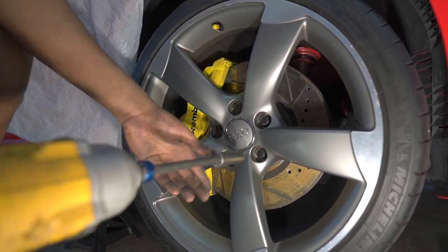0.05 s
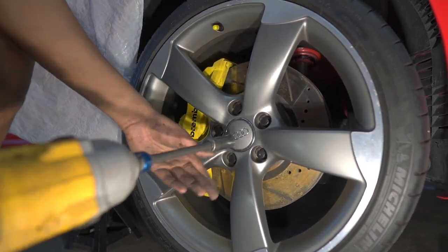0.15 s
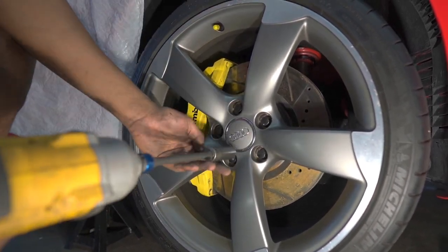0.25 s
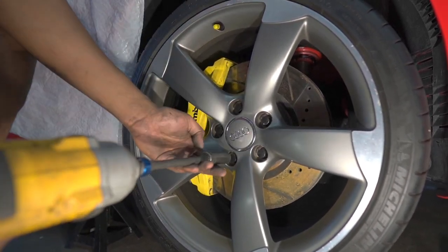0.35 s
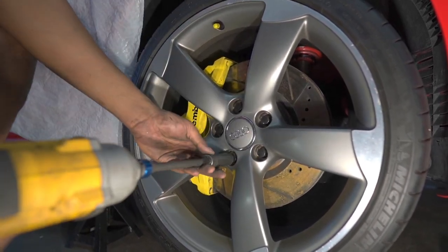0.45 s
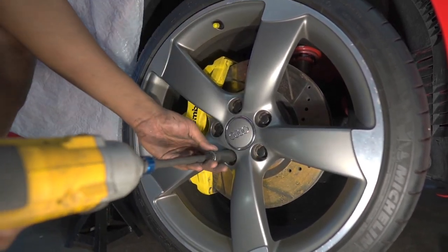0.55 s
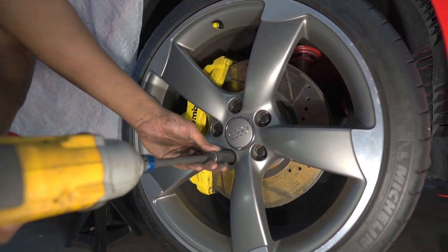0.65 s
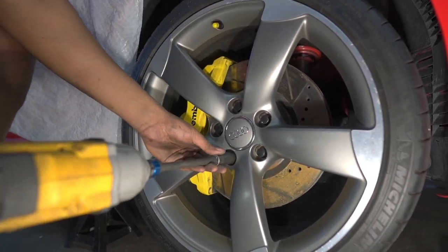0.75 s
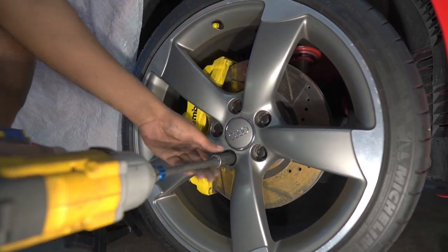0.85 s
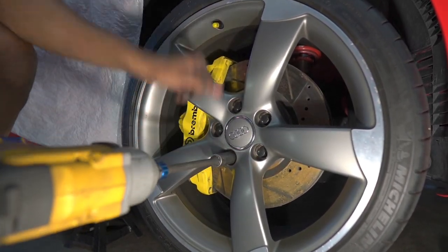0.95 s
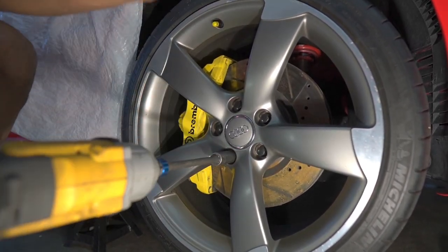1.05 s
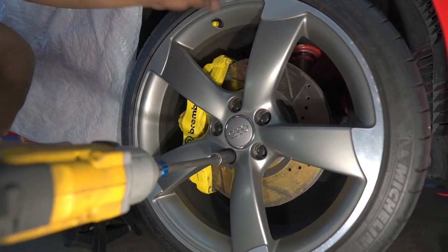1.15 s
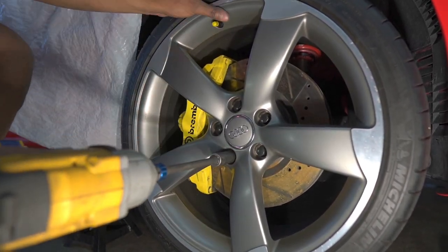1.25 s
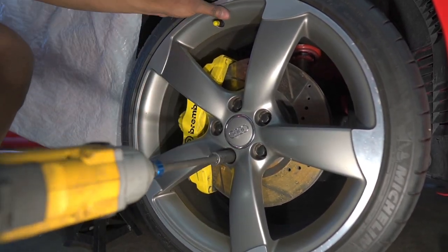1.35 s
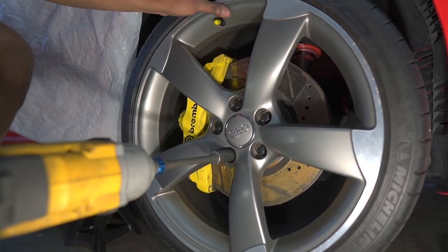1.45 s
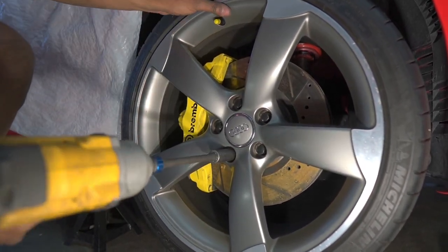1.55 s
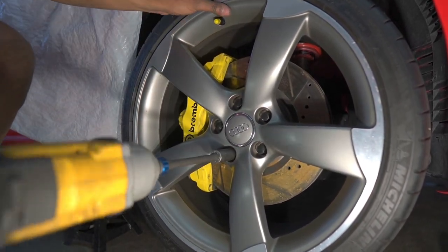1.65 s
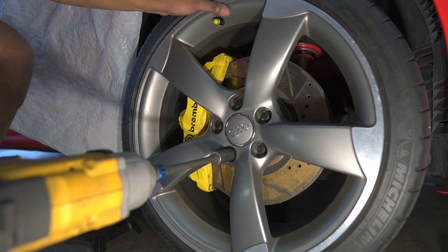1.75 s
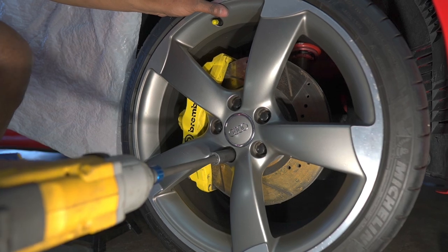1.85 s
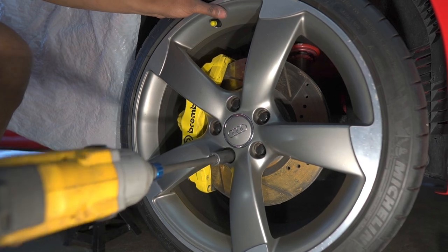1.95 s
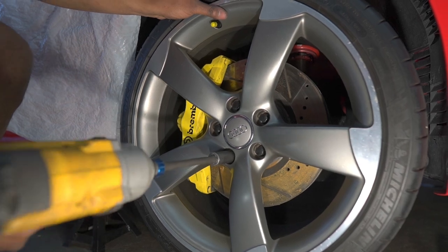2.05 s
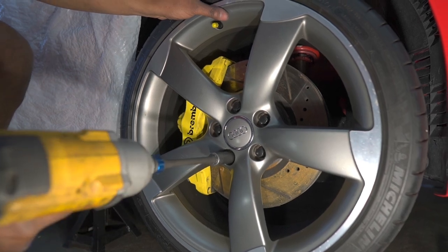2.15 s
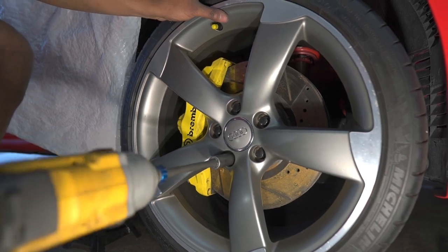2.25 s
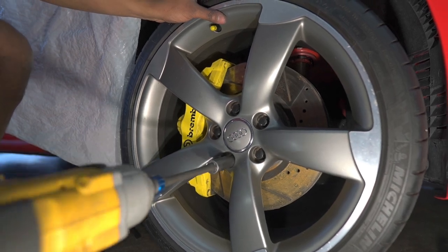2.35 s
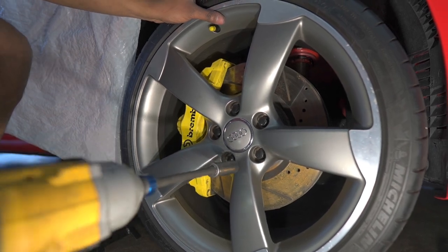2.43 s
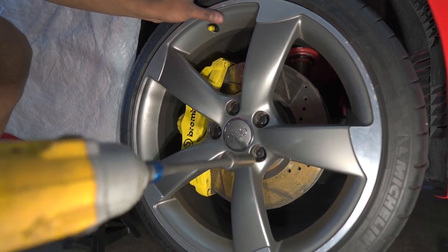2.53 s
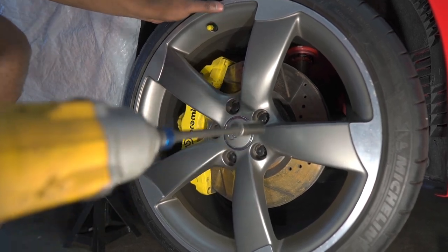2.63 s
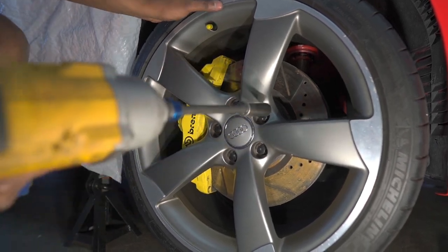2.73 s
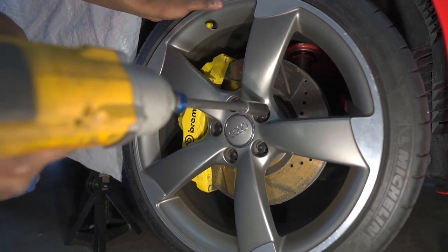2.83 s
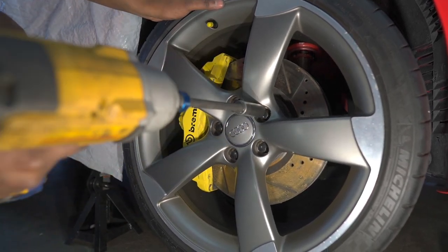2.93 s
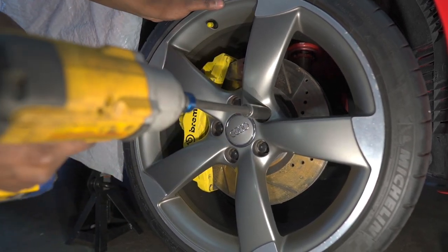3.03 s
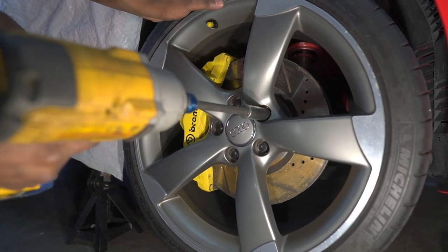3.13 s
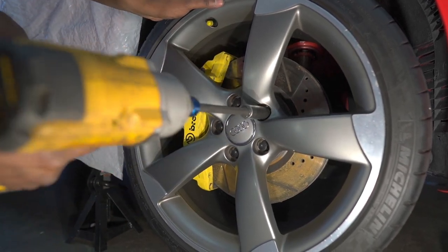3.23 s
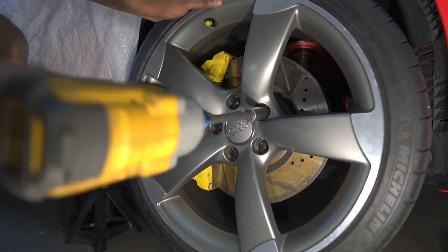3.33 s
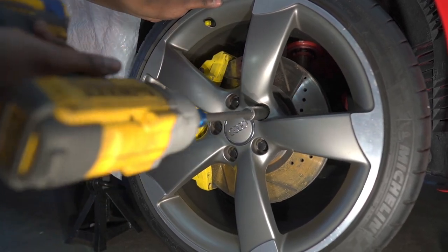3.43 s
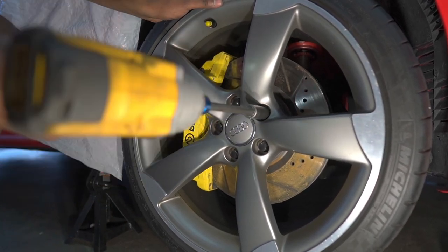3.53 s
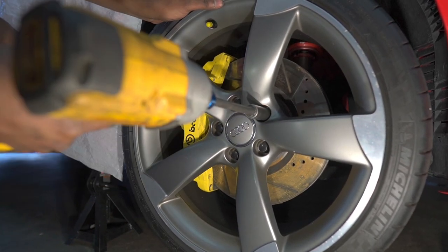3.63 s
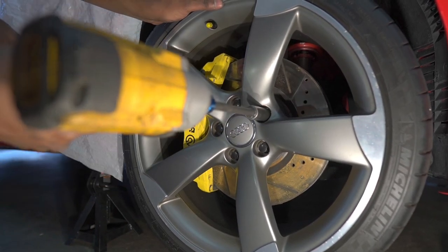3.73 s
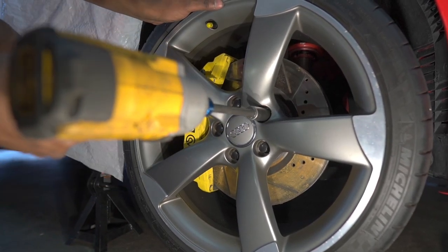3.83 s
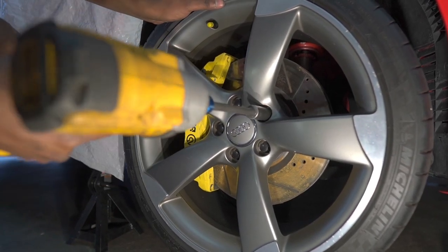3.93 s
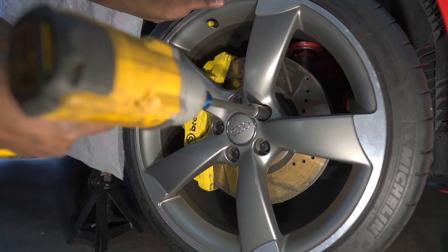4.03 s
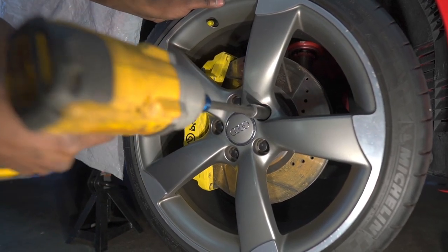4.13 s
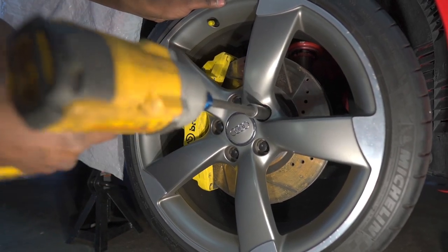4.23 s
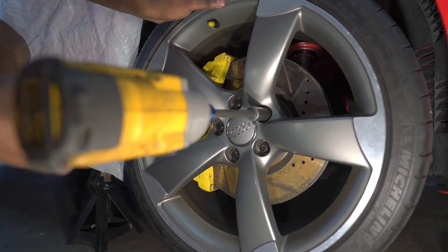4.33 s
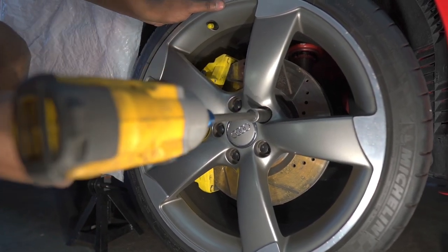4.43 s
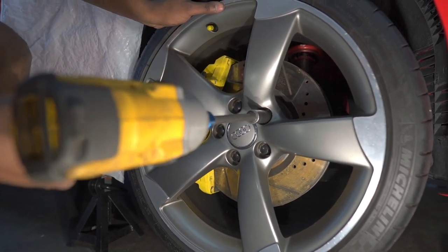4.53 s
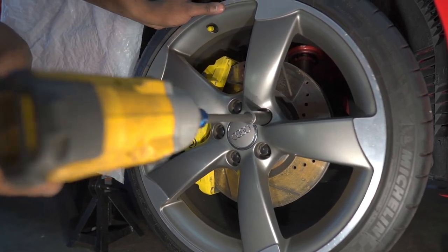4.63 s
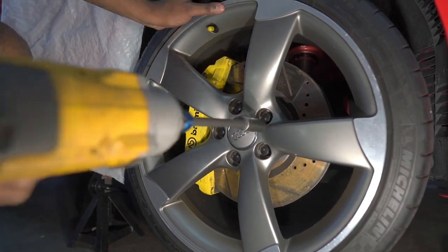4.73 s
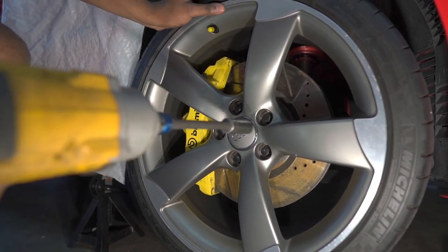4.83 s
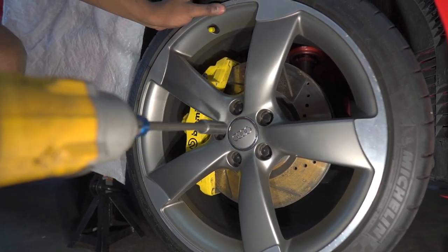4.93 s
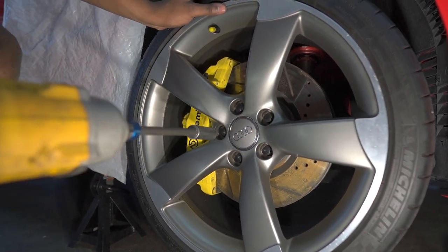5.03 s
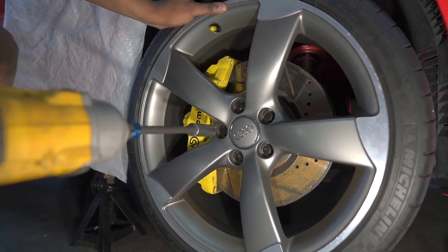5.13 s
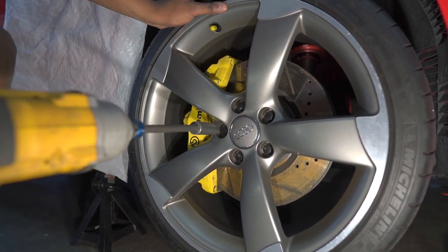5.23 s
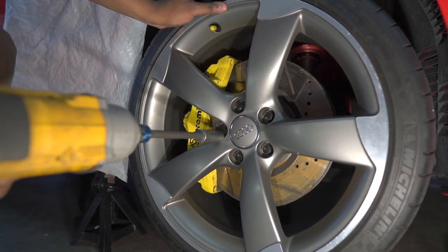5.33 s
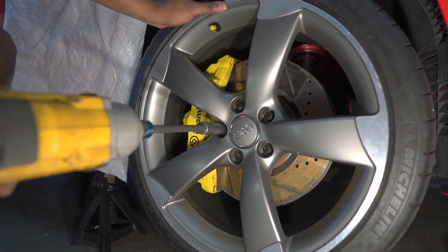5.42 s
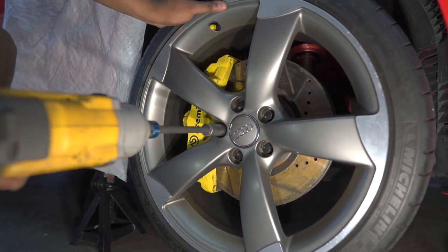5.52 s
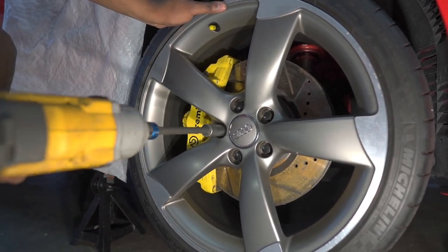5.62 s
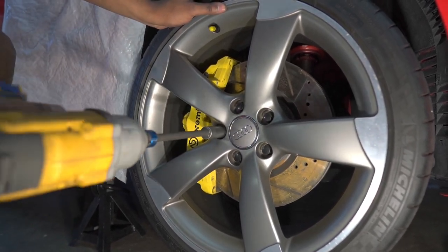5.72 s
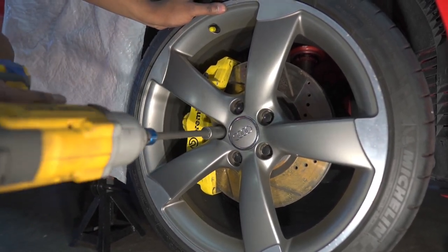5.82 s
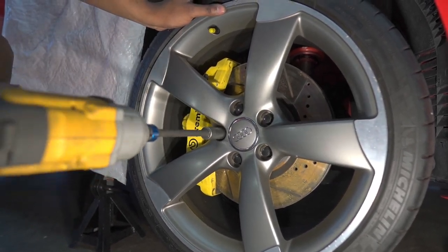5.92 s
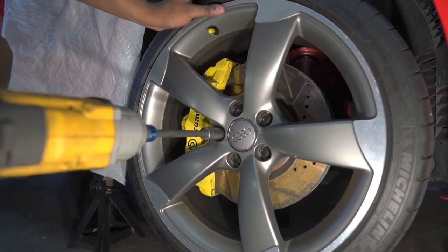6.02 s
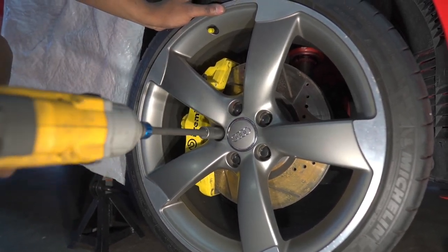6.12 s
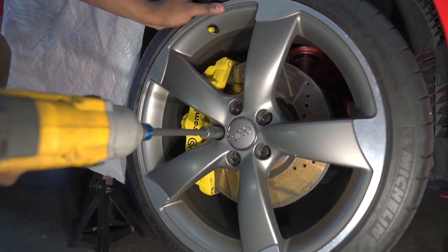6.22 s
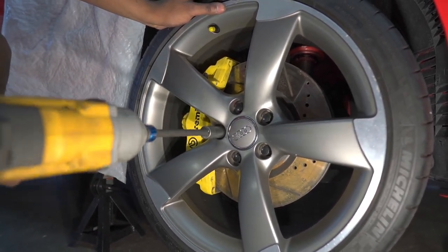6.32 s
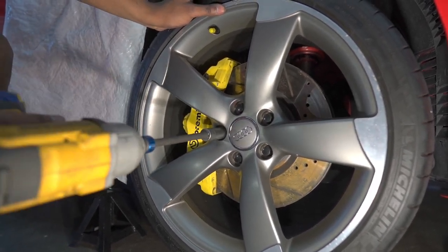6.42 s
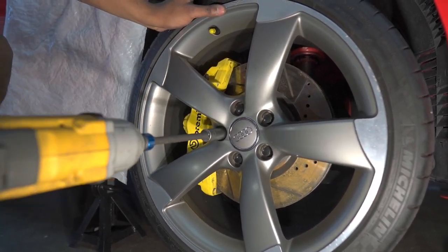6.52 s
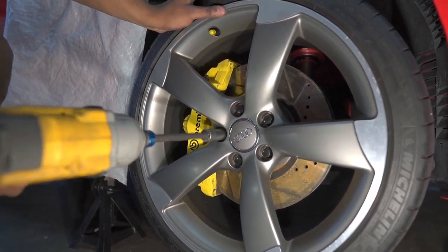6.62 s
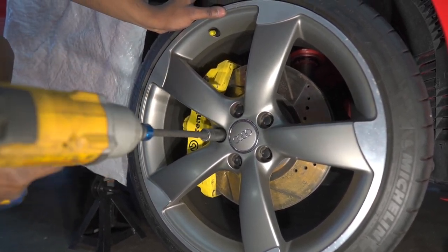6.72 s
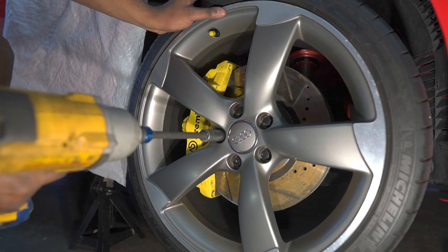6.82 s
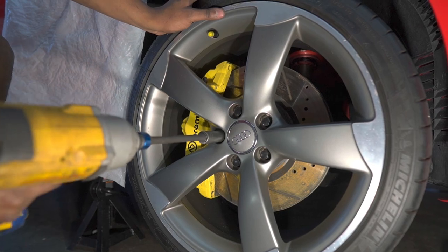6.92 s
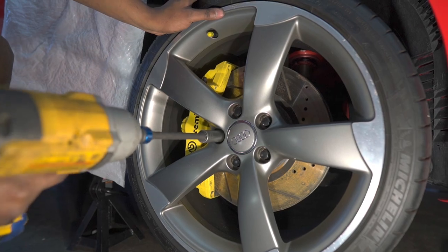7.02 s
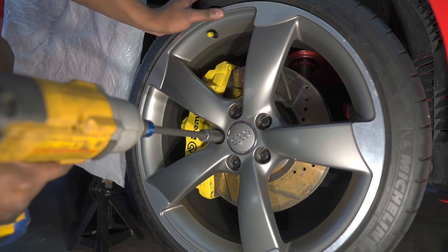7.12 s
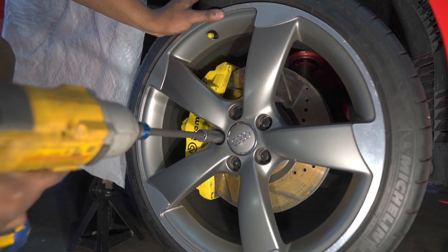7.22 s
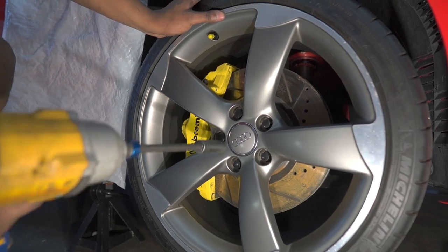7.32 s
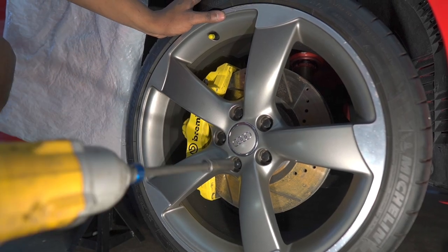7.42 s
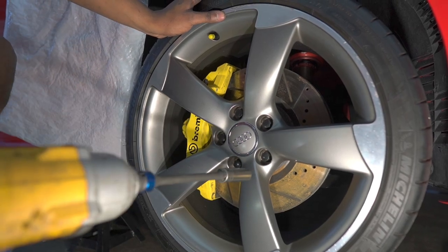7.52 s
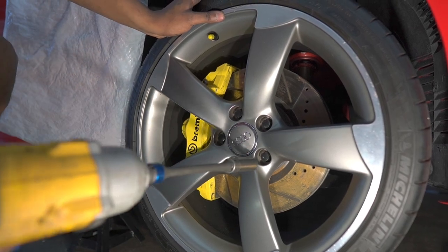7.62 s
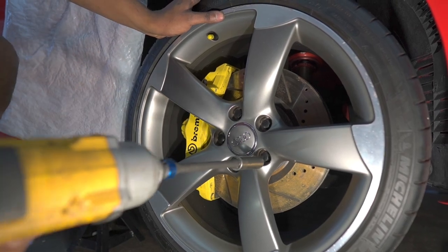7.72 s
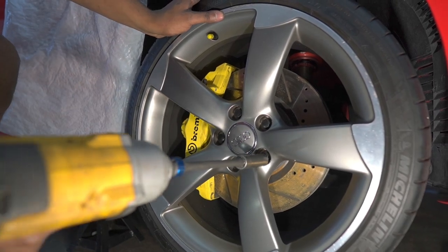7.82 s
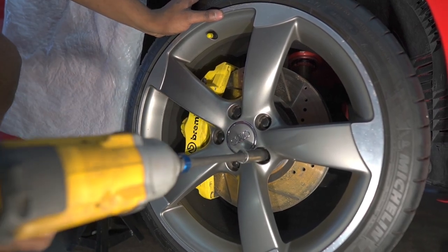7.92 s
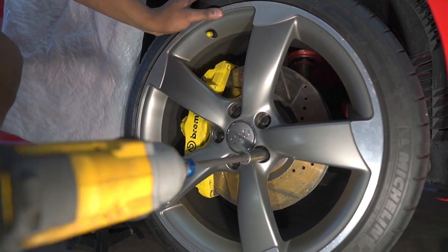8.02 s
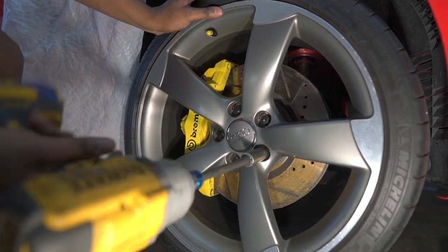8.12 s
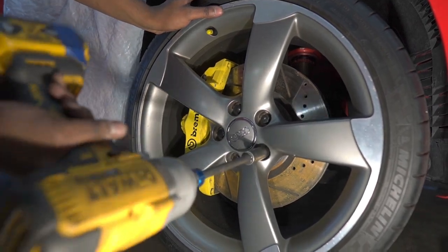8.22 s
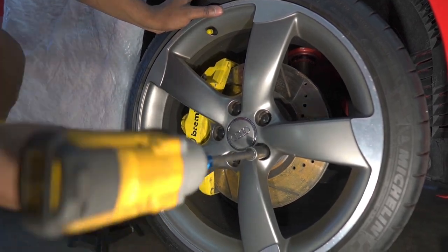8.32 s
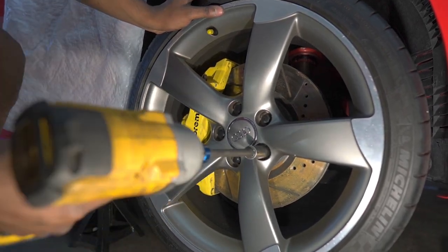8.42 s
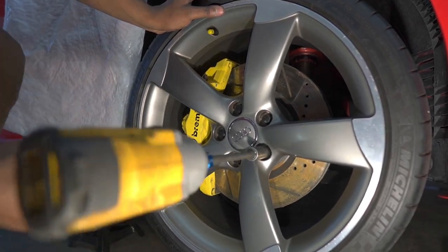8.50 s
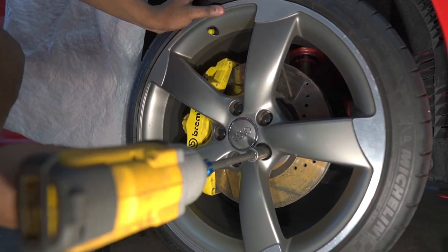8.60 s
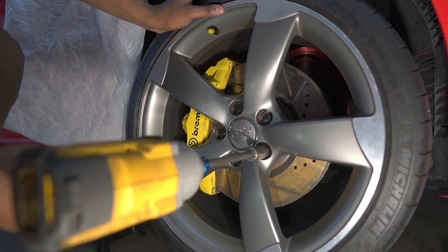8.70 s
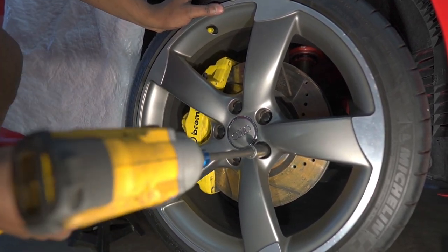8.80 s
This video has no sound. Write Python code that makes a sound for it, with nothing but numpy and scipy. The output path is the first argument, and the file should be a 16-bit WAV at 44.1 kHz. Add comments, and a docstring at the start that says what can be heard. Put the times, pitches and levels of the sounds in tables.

```python
"""Impact wrench on wheel bolts

A cordless impact wrench runs six short bursts in a garage, close to a small microphone: noise makes
the motor's whirr, and each hammer blow is a noise crack with a rough ring. Between bursts the socket
clicks onto the bolts, built from rattles and ringing modes, and knocks a hollow thud out of the wheel.
A bird chirps in gliding tones outside; a hand slides on the tool; hum and rumble lie under filtered air.
The blows overload the microphone, and puffs of cooling air push it against one rail."""
import sys
import numpy as np
from scipy import signal
from scipy.fft import rfft, irfft
from scipy.io import wavfile
from scipy.ndimage import uniform_filter1d

SR = 44100
rng = np.random.default_rng(int(sys.argv[2]) if len(sys.argv) > 2 else 0)


def wav_record(signal):
    """Record a signal, one row per channel, as 16-bit PCM in the file named by sys.argv[1]."""
    frames = np.transpose(np.atleast_2d(signal))
    bounded = np.clip(frames, -1, 1)
    # unit amplitude maps onto the largest positive 16-bit level
    quanta = np.round(bounded * 32767).astype(np.int16)
    wavfile.write(sys.argv[1], SR, quanta)


N = 390726

# trigger pulls: pull t/s, let-go t/s, motor level at the pull/dB, full-load level/dB, coasting fall/(dB/s)
BURSTS = [(1.267, 1.737, -46, -6, 115.5), (1.925, 2.32, -19, -10.5, 96.5), (3.857, 4.409, -46.5, -8.5, 90),
          (5.957, 6.413, -42.5, -7, 100.5), (6.562, 6.966, -20.5, -8, 132), (8.658, 8.953, -50, -7, 88)]
WHEEL_HZ, WHEEL_WIDTH_HZ = 335, 40  # the wheel's hollow resonance
BEAT_S = 0.027  # between hammer blows on a steady beat


def amp(db):
    """Decibels to a linear gain."""
    return 10 ** (np.asarray(db) / 20)


def evened(x):
    """Scales a signal to rms 1."""
    return x / np.sqrt(np.mean(x ** 2) + 1e-20)


def read(points, hz):
    """Reads a curve of (f/Hz, value) points along a log frequency axis."""
    f, value = np.transpose(points)
    return np.interp(np.log(hz + 1), np.log(f + 1), value)


def add(mix, s, sound):
    """Mixes a sound in at s seconds, cut off at the end of the scene."""
    part = mix[round(s * SR):][:len(sound)]
    part += sound[:len(part)]


def noise(points):
    """Steady noise shaped by a spectrum curve, rms 1."""
    hz = np.fft.rfftfreq(N, 1 / SR)
    spectrum = rfft(rng.standard_normal(N)) * amp(read(points, hz))
    return evened(irfft(spectrum, N))


def resonate(x, hz, width_hz):
    """Shifts hz down to zero, smooths, and shifts back: a resonance of gain 1."""
    turn = np.exp(2j * np.pi * np.cumsum(hz * np.ones(len(x))) / SR)
    r = np.exp(-np.pi * width_hz / SR)
    smooth = signal.lfilter([1 - r], [1, -r], x / turn)
    return 2 * (turn * smooth).real


def band(x, kind, hz, order=2):
    """Butterworth filter."""
    return signal.sosfilt(signal.butter(order, hz, kind, fs=SR, output="sos"), x)


def dying(t, t60, rise):
    """A quick rise, then a decay of 60 dB in t60 seconds (at least 4 ms)."""
    return (1 - np.exp(-t / rise)) * amp(-60 * t / max(t60, .004))


def room(x, t60s, first=.004):
    """Echoes: sparse taps of random sign, each band dying at its own speed, energy 1."""
    taps = np.zeros(SR)
    at = np.arange(round(first * SR), SR - 20, 20)
    taps[at + rng.integers(0, 20, len(at))] = rng.choice([-1., 1.], len(at))
    hz, t, z = signal.stft(taps, SR, nperseg=256)
    decay = amp(-60 * t / read(t60s, hz)[:, None])
    tail = signal.istft(z * decay, SR, nperseg=256)[1]
    return signal.fftconvolve(x, tail / np.linalg.norm(tail))[:N]


def background():
    """Still air of the garage as shaped noise, a faint fuzzy hum and a lumpy rumble of far traffic."""
    # still air: f/Hz, relative density/dB
    air_curve = [(60, -30), (100, -7.5), (180, -10), (400, -22), (900, -22), (2000, -26), (2600, -32),
                 (4600, -37), (6000, -49.5), (10000, -46.5), (16300, -69)]
    # far traffic: t/s, level/dB
    rumble_levels = [(0, -44.5), (1.199, -43), (2.601, -59), (3.401, -45), (5, -56), (8.86, -54)]
    hum = amp(-63.5) * evened(resonate(rng.standard_normal(N), 660, 70))
    rumble = evened(band(band(rng.standard_normal(N), "low", 60), "high", 35))
    s, db = np.transpose(rumble_levels)
    rumble_db = np.interp(np.arange(N) / SR, s, db)
    return amp(-55) * noise(air_curve) + band(hum, "low", 1500) + amp(rumble_db) * rumble


def clicks():
    """A short clumpy rattle shakes the socket's modes, loose parts settle; the wheel thuds hollowly."""
    # socket on bolts and wheel, trigger clicks:
    # t/s, level/dB, main ring f/Hz, relative wheel thud/dB, relative socket body/dB
    hits = [(0.222, -41, 4070, -40, -30), (0.376, -41.5, 4350, -32, -30), (0.57, -18, 2370, -38, -22),
            (0.578, -25, 1950, -38, -11), (0.598, -13.5, 1440, -42, -28), (0.606, -14.5, 2330, -46, -4.5),
            (0.699, -28.5, 1380, -29, 6), (0.734, -15, 3900, -46, -11), (0.751, -7, 2500, -50, 1),
            (0.875, -28, 1550, -9.5, -11), (0.902, -35.5, 1080, -16, -4), (0.964, -38.5, 1750, -21, -6),
            (1.004, -34.5, 2530, -21, -24), (1.108, -41, 2550, -40, -31), (1.179, -31.5, 1650, -2.5, -5),
            (1.205, -31.5, 910, -21, -1), (1.272, -25, 2220, -17, -13), (3.054, -32, 1280, -9, 4),
            (3.074, -32.5, 1360, -26, 4), (3.106, -16, 2380, -23, -38), (3.13, -15.5, 3050, -12.5, -33),
            (3.257, -26.5, 864, -2, -9), (3.309, -29.5, 1050, -5, -1), (3.362, -14.5, 2240, -36, -19),
            (3.388, -15, 2980, -18, -5), (3.403, -19.5, 1140, -30, -26), (3.5, -24, 1100, 3, -1.5),
            (3.72, -44, 2490, -32.5, -24), (3.8, -34, 1120, -30, -26), (3.859, -28, 2750, -46.5, -25),
            (3.872, -26, 2600, -24, -12), (4.683, -21.5, 2390, -45, -30), (4.7, -21.5, 2200, -45, -43),
            (4.732, -30.5, 2380, -42, -24), (4.949, -54, 2200, -41, -30), (5.014, -37, 966, -37, -5.5),
            (5.361, -13, 1400, -14, -12.5), (5.447, -18, 1940, -26, -39), (5.495, -16.5, 2080, -20, -40),
            (5.504, -10.5, 3420, -41, -42), (5.586, -15, 1012, -17, -13), (5.882, -32, 2540, -37, -22),
            (5.948, -27.5, 1230, -32, -30), (7.231, -40, 4500, -40, -27), (7.265, -30.5, 4000, -31, -19),
            (7.359, -20.5, 2750, -42, -25), (7.841, -24.5, 1830, -12, -7), (7.902, -36, 1970, -22, -0.5),
            (7.946, -23.5, 1950, -13, -9), (7.966, -22.5, 966, -37, -26), (8.006, -19.5, 1960, -17, -14),
            (8.026, -26.5, 1050, 1, -7), (8.085, -41, 1400, -15, -22), (8.131, -27.5, 2860, -3.5, 0.5),
            (8.17, -32, 3650, -23, -16), (8.185, -13, 2870, -13.5, -16), (8.27, -35, 1110, -19, -16),
            (8.284, -30.5, 2930, -30.5, -17), (8.306, -38, 1420, -32, -22), (8.329, -29, 2510, -14, -16),
            (8.343, -14, 2420, -8, -21), (8.524, -34, 2950, -7, -21), (8.599, -34, 850, -39, -24),
            (8.661, -44, 3410, -4, 4)]
    # modes of the socket: f/Hz, relative level/dB, t60/s
    socket_modes = [(900, 0, .04), (1090, -8, .035), (1450, -7, .04), (2000, -10, .025), (2540, -3, .03)]
    rise_s, rise_db = 0.00035, -0.44  # softer clicks rise more slowly, dB of rise time per dB
    treble_db, treble_gain = -24, 0.1  # harder clicks are brighter, dB of treble per dB
    treble_sharpness = 1.2  # the treble dies a little sooner

    out, t = np.zeros(N), np.arange(SR // 3) / SR
    socket = sum(amp(db - 60 * t / t60) * np.sin(2 * np.pi * hz * t) for hz, db, t60 in socket_modes)
    textures = rng.standard_normal((len(hits), 2, len(t)))
    for (s, db, hz, thud_db, body_db), (grit, clumps) in zip(hits, textures):
        bounce = amp(2.5 * evened(uniform_filter1d(clumps, 70)))  # parts bounce unevenly
        shake = dying(t, 0.044, rise_s * amp(rise_db * (db + 21.5))) * bounce
        settle = amp(-20.5) * dying(t, 0.44, 0.0046) * bounce

        body_grit = evened(band(band(grit, "high", 840, order=1), "low", 4040, order=3))
        rattle = body_grit * (shake + settle)
        main = evened(resonate(resonate(grit, hz, 320), hz, 320)) * shake
        shaken = signal.fftconvolve(grit * shake, socket)[:len(t)]
        modes = socket / abs(socket).max() + 0.8 * shaken / abs(shaken).max()
        metal = 0.55 * rattle + 0.37 * main + amp(body_db) * modes / abs(modes).max()

        treble = evened(band(band(grit, "high", 7700), "low", 11000, order=4))
        treble *= shake ** treble_sharpness + amp(-21.5) * settle
        bright = amp(treble_db + treble_gain * (db + 20.5)) * treble

        hollow = np.sin(2 * np.pi * WHEEL_HZ * t)
        hollow += 0.86 * evened(resonate(clumps, WHEEL_HZ, WHEEL_WIDTH_HZ))
        thud = amp(thud_db) * hollow * dying(t, 0.09, 0.0099)
        add(out, s, amp(db) * (metal + bright + thud))
    return out


def fidgeting(small):
    """Fingers shift on the tool for half a second after each click: faint, thin ticks at random."""
    loud = 1. * (abs(small) > .01)
    busy = uniform_filter1d(loud, SR // 2, origin=SR // 4 - 1) > 0  # the window looks back
    strengths = amp(4 * np.minimum(rng.exponential(1, N), 3))
    ticks = strengths * (rng.random(N) < 40 / SR) * busy  # 40 a second on average
    t = np.arange(600) / SR
    tick = rng.standard_normal(len(t)) * dying(t, 0.06, .0005)
    return amp(-63.5) * band(signal.fftconvolve(ticks, tick)[:N], "band", [1500, 7000])


def bird():
    """A falling whistle and a short low upturn, heard mostly as echoes from the yard."""
    # chirps: t/s, level/dB
    calls = [(0.414, -46.5), (2.6, -49), (5.051, -54), (7.225, -48), (7.931, -45)]
    out, t = np.zeros(N), np.arange(round(.035 * SR)) / SR
    shape = np.hanning(len(t))
    fall = np.sin(2 * np.pi * np.cumsum(np.linspace(5500, 3400, len(t))) / SR) * shape
    turn = np.sin(2 * np.pi * np.cumsum(np.linspace(2700, 3200, len(t))) / SR) * shape
    for s, db in calls:
        add(out, s, amp(db) * fall)
        add(out, s + .065, amp(db - 18) * turn)
    yard = room(out, [(2000, 0.64), (6000, 0.33)], first=0.008)  # f/Hz, t60/s
    return band(out + amp(8.0) * yard, "band", [2500, 5600])


def burst_db(t, pull, let_go, pull_db, full_db, coast_db):
    """The motor spins up from the pull, sags a little under load, brakes at the let-go and coasts down."""
    spin_up_s, sag_db_per_s = 0.081, 10.5
    brake_db, brake_s = -6, 0.044  # the brake bites first, then the motor coasts
    since, free = np.maximum(t - pull, 0), np.maximum(t - let_go, 0)
    spin_up_db = full_db + (pull_db - full_db) * np.exp(-(since / spin_up_s) ** 1.5)
    driven_db = spin_up_db - sag_db_per_s * since
    slowed_db = brake_db * (1 - np.exp(-(free / brake_s) ** 2)) - coast_db * free
    return np.where(t < pull, -140, np.maximum(driven_db + slowed_db, -140))


def motor():
    """Gear and brush noise, gritty from uneven teeth; the treble fades faster than the rest as it coasts."""
    # motor spectrum: f/Hz, relative density/dB
    whirr_curve = [(59, -41), (100, -20.5), (245, -21.5), (303, -7.5), (652, -27), (1040, -7), (1560, -9),
                   (2900, 0), (3230, -2.5), (4540, -2.5), (6110, -14), (10400, -28), (15300, -45.5),
                   (16300, -62.5)]
    whine_hz, whine_width_hz = 3500, 600  # unloaded gears as the motor starts
    whine_db, whine_s = 3, 0.05
    treble_fade = 0.7  # extra dB the treble loses for each dB of level

    out, t = np.zeros(N), np.arange(N) / SR
    whirr = noise(whirr_curve)
    whirr *= amp(1.0 * evened(uniform_filter1d(rng.standard_normal(N), 90)))  # grit, 1 dB rms
    treble = band(whirr, "high", 11000)
    whine = evened(resonate(resonate(whirr, whine_hz, whine_width_hz), whine_hz, whine_width_hz))
    for row in BURSTS:
        level_db = burst_db(t, *row)
        starting = amp(whine_db) * np.exp(-((t - row[0]) / whine_s) ** 2) * whine
        treble_change = (amp(treble_fade * (level_db + 26.5)) - 1) * treble
        out += amp(level_db) * (whirr + starting + treble_change)
    return out


def cooling_air(effort):
    """Smooth one-way puffs of pressure, plus a lumpy draught that follows the motor."""
    # puffs on the microphone: t/s, pressure level/dB, length (bell curve)/s
    gusts = [(1.538, 2, 0.026), (1.6, -6, 0.014), (2.097, -8.5, 0.017), (2.138, 3, 0.028),
             (4.237, 1.5, 0.032), (4.356, -3, 0.016), (6.24, 2.5, 0.022), (6.75, 1, .025),
             (6.809, 1, 0.012)]
    t = np.arange(N) / SR
    puffs = sum(amp(db) * np.exp(-((t - s) / length) ** 2) for s, db, length in gusts)
    lumps = evened(band(band(rng.standard_normal(N), "low", 45), "high", 3.5))
    draught = amp(-15.5) * lumps * uniform_filter1d(abs(effort), 6000)
    return draught - puffs


def driven_blows():
    """A tight bolt keeps the hammer on its beat: longer pauses fill with blows like the last one."""
    # clear hammer blows on the anvil: t/s, level/dB, anvil ring f/Hz, ring t60/s
    clear_blows = [(1.3044, 10, 2420, 0.011), (1.3415, 5.5, 2420, 0.017), (1.3708, 3.5, 2960, 0.051),
                   (1.401, 2.5, 2500, .03), (1.408, 9.5, 2640, 0.069), (1.431, -3.5, 2600, 0.047),
                   (1.442, 8, 2550, 0.052), (1.4692, 6, 2510, 0.058), (1.486, 5, 2520, 0.067),
                   (1.4952, 7, 2470, 0.082), (1.5114, 16.5, 2470, 0.088), (1.5473, 10, 2600, 0.091),
                   (1.6752, -5.5, 2350, .021), (1.9262, -3.5, 1980, 0.08), (1.9423, 17.5, 2940, .017),
                   (1.962, 10.5, 2160, 0.032), (1.9779, 14, 2650, 0.092), (2.016, 14, 2520, 0.13),
                   (2.0589, 16.5, 2560, 0.066), (2.0793, 18.5, 2456, 0.077), (2.1338, 4, 2100, 0.23),
                   (2.1769, 14, 2570, 0.041), (2.2301, -5, 3030, 0.097), (2.2598, -6.5, 2640, 0.067),
                   (2.2893, -12.5, 2630, 0.041), (3.9028, 1.5, 2480, .021), (3.9515, -1, 3220, 0.04),
                   (3.961, 6, 2600, 0.044), (3.972, 9, 2860, 0.042), (3.9953, 4.5, 2620, 0.057),
                   (4.008, -2.5, 2620, 0.1), (4.027, 1, 2460, .05), (4.035, 6, 2600, 0.059),
                   (4.0631, 7.5, 2770, 0.052), (4.0898, 10.5, 2170, 0.058), (4.117, 13.5, 3040, 0.076),
                   (4.134, 22.5, 2530, .12), (4.1597, 15.5, 2600, .13), (4.1891, 21, 2557, 0.063),
                   (4.3018, -11, 3020, .03), (4.3224, -0.5, 3150, 0.045), (4.332, 10, 2610, .07),
                   (4.364, -3, 3060, 0.043), (4.3809, -2, 2620, 0.031), (5.9978, -0.5, 2940, 0.028),
                   (6.03, 1, 2270, 0.021), (6.042, 12, 2650, 0.018), (6.0543, 4.5, 2920, 0.031),
                   (6.0811, 3, 2450, 0.038), (6.089, 4, 2510, 0.045), (6.11, 0.5, 2300, 0.027),
                   (6.121, 4, 2640, 0.074), (6.1476, 6, 3160, 0.075), (6.174, 4, 1920, 0.068),
                   (6.2001, 10, 3120, .07), (6.2182, 10.5, 2700, 0.071), (6.242, 3.5, 2830, 0.11),
                   (6.2777, 11.5, 2510, 0.11), (6.3092, 9.5, 2920, 0.067), (6.3263, 17.5, 2510, 0.05),
                   (6.363, -4.5, 2560, 0.08), (6.5464, -14.5, 2400, 0.028), (6.564, 6, 2820, 0.017),
                   (6.5891, 6, 2420, 0.016), (6.6047, -13, 2730, 0.034), (6.616, 6, 2840, 0.034),
                   (6.636, 14.5, 2740, 0.072), (6.67, 21.5, 2480, 0.059), (6.699, 17.5, 2920, 0.2),
                   (6.754, 7.5, 2510, 0.083), (6.8836, 3, 2740, 0.056), (6.9054, 4, 2970, 0.088),
                   (6.9229, -1, 2930, 0.039), (6.951, -11.5, 2730, 0.045), (8.697, 2.5, 2820, 0.02),
                   (8.739, 5, 2570, 0.018), (8.752, 0, 2730, 0.027), (8.7646, 11.5, 2800, 0.021),
                   (8.8015, 9, 2580, 0.039), (8.822, 5, 2590, 0.11), (8.8586, 15, 2760, .06)]
    loaded_db = -9.5  # motor level that counts as full load
    upper_db, upper_loaded_db = -10.5, -0.5  # the upper ring grows with the load

    rows = list(clear_blows)
    for (s, *blow), (later, *_) in zip(clear_blows, clear_blows[1:]):
        if .053 < later - s < .14:
            beats = np.linspace(s, later, round((later - s) / BEAT_S) + 1)
            rows += [(at, *blow) for at in beats[1:-1]]
    s, db, hz, t60 = np.transpose(rows)
    motor_db = np.max([burst_db(s, *row) for row in BURSTS], axis=0)
    load = np.minimum(amp(motor_db - loaded_db), 1)
    return list(zip(s, db, hz, t60, upper_db + (upper_loaded_db - upper_db) * load))


def coasting_blows():
    """The hammer ratchets on as the motor coasts: even blows whose level slides along each run."""
    # runs of blows: first t/s, last t/s, first level/dB, last level/dB
    runs = [(2.317, 2.502, -7, -13), (2.5342, 2.628, -20.5, -33.5), (4.4598, 4.5922, -13, -15),
            (4.6254, 4.65, -19, -27), (6.424, 6.5278, -17.5, -13)]
    rows = []
    for first, last, first_db, last_db in runs:
        way = np.linspace(0, 1, round((last - first) / BEAT_S) + 1)
        s, db = first + (last - first) * way, first_db + (last_db - first_db) * way
        hz = 2300 * np.exp(.1 * rng.standard_normal(len(way)))  # the ring varies by about a tenth
        t60, upper_db = 0.034 + 0 * way, -5 + 0 * way
        rows += zip(s, db, hz, t60, upper_db)
    return rows


def hammer():
    """Each blow cracks, then the anvil and extension ring roughly while the parts chatter."""
    # crack spectrum: f/Hz, relative density/dB
    crack_curve = [(88, -59.5), (150, -20.5), (604, -11), (1960, -4), (2200, 1), (2900, 0), (3460, -9),
                   (4050, -6.5), (8700, -14.5), (9780, -15.5), (16300, -35.5)]
    crack_db = -2.5
    anvil_width_hz, upper_hz, upper_width_hz = 270, 4134, 1000
    upper_spread_db, upper_spread = 6.5, 0.035  # level and log-pitch spread of the upper ring

    out, t = np.zeros(N), np.arange(SR // 6) / SR
    blows = driven_blows() + coasting_blows()
    crack, chatter = noise(crack_curve), rng.standard_normal((len(blows), 2, len(t)))
    # each blow lands differently
    landings = rng.standard_normal((len(blows), 2)) * [upper_spread_db, upper_spread]
    for blow, (landing_db, shift), (low, high) in zip(blows, landings, chatter):
        s, db, hz, t60, usual_db = blow
        blow_upper_db, blow_upper_hz = usual_db + landing_db, upper_hz * np.exp(shift)

        tone = np.sin(2 * np.pi * hz * t) * amp(-5.5 - 60 * t / 0.054)
        struck = tone + 0.66 * evened(resonate(low, hz, anvil_width_hz))
        upper = resonate(high, blow_upper_hz, upper_width_hz)
        upper = evened(resonate(upper, blow_upper_hz, upper_width_hz))
        rings = struck + amp(blow_upper_db) * upper
        ring = rings / np.hypot(1, amp(blow_upper_db)) * dying(t, t60, 0.000058)

        burst = crack[round(s * SR) - len(t):][:len(t)]
        burst = burst * amp(crack_db) * dying(t, .5 * t60, .0001)
        add(out, s, amp(db) * (0.61 * ring + burst))
    return out


def scrape():
    """A hand slides on the tool, skin rubbing plastic: a soft swell of grainy noise."""
    # swell: t/s, level/dB
    swell = [(5.7, -62), (5.798, -38), (5.9, -57)]
    # rubbing spectrum: f/Hz, relative density/dB
    rub_curve = [(180, -76), (300, -33), (364, -19), (1570, -6), (2350, -14.5), (4470, -15), (14000, -32)]
    s, db = np.transpose(swell)
    return noise(rub_curve) * amp(np.interp(np.arange(N) / SR, s, db, -120, -120))


def scene():
    """Mixes the close sounds, their garage echoes, the bird, the background and the moving air."""
    # garage echoes: f/Hz, t60/s
    garage_t60s = [(200, .4), (700, 0.31), (2000, 0.21), (4600, 0.13), (9000, 0.19), (16000, 0.081)]
    whirr, blows, small = motor(), hammer(), clicks()
    blows = blows + amp(-2) * resonate(blows, WHEEL_HZ, WHEEL_WIDTH_HZ)  # the wheel takes every blow
    sent = amp(-11.5) * blows + amp(-19.5) * whirr + amp(-11.5) * small
    echoes = room(sent, garage_t60s)
    near = whirr + blows + small + scrape() + fidgeting(small)
    return (near + echoes + bird() + background() + cooling_air(whirr))[None]


def record(dry):
    """The capsule clips, a capacitor recentres it, gain control eases off overloads, a low-pass ends the band."""
    rail, edge_hz = 0.89, 15900
    clipped = rail * np.tanh((dry[0] / rail) ** 3 / 3 + dry[0] / rail)
    coupled = band(clipped, "high", 39)

    keep = np.exp(-1 / (0.02 * SR))  # power averaged over 20 ms
    power_db = 10 * np.log10(signal.lfilter([1 - keep], [1, -keep], coupled ** 2) + 1e-12)
    recovery_db = np.arange(N) * 76.0 / SR  # the held level falls 76 dB a second
    held_db = np.maximum.accumulate(power_db + recovery_db) - recovery_db
    eased = coupled / amp(0.71 * np.maximum(held_db + 12, 0))

    low_pass = signal.firwin(511, edge_hz, window=("kaiser", 9), fs=SR)
    limited = signal.oaconvolve(eased, low_pass, "same")
    return np.clip(limited, -1, 1)[None]


dry = scene()
out = record(dry)
wav_record(out)
```